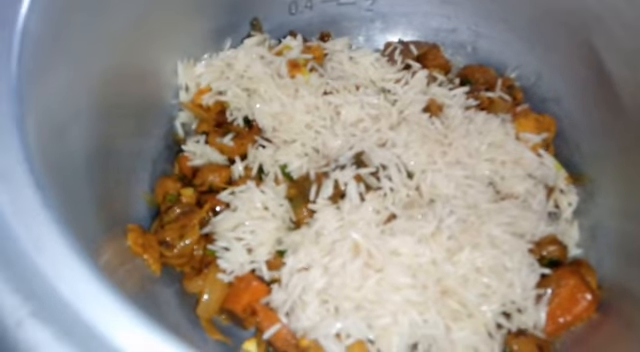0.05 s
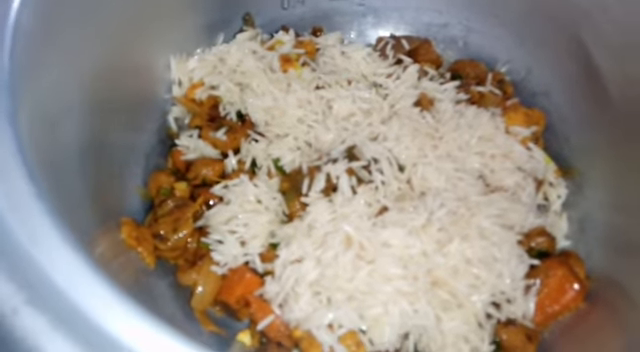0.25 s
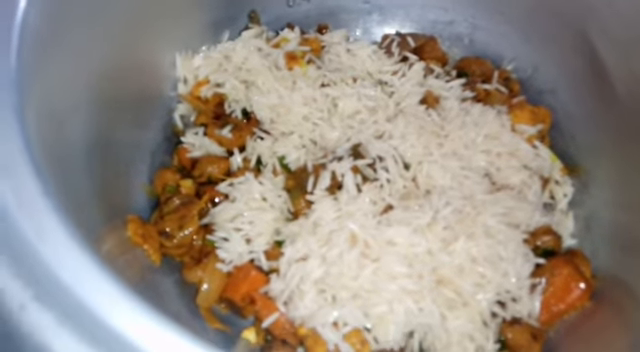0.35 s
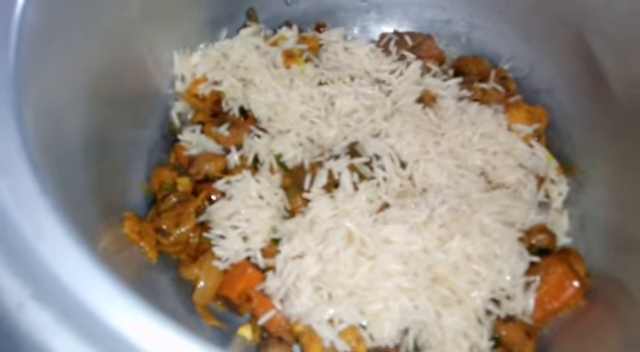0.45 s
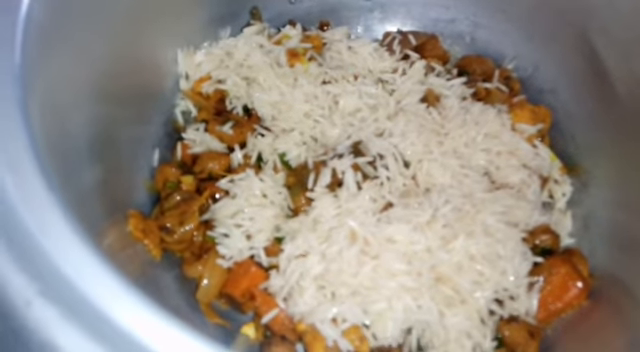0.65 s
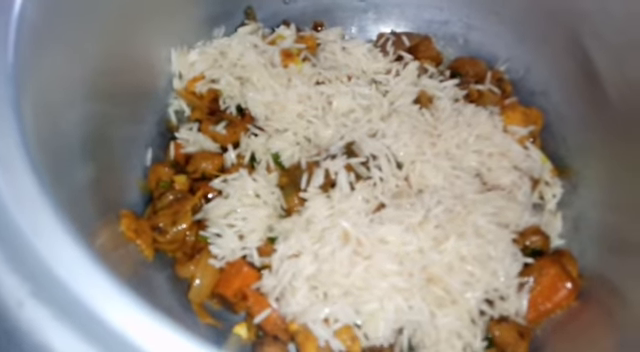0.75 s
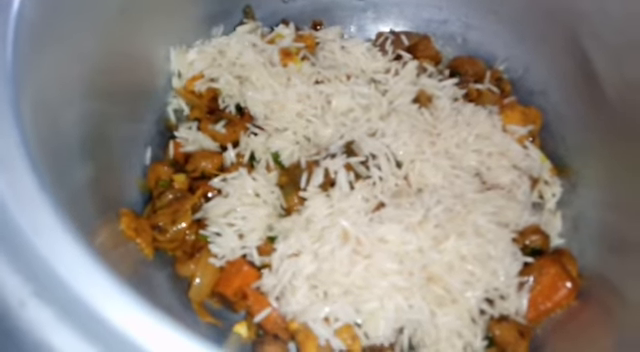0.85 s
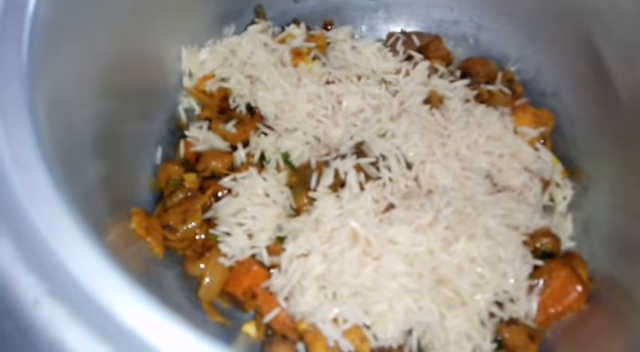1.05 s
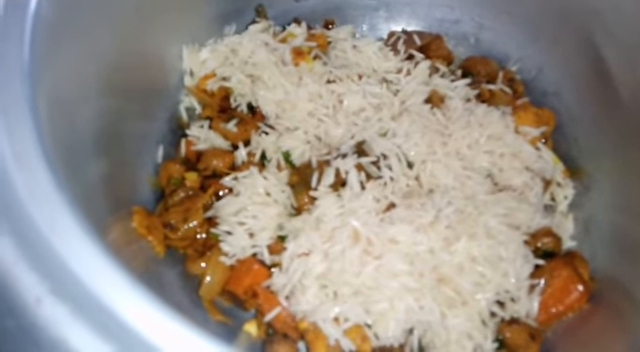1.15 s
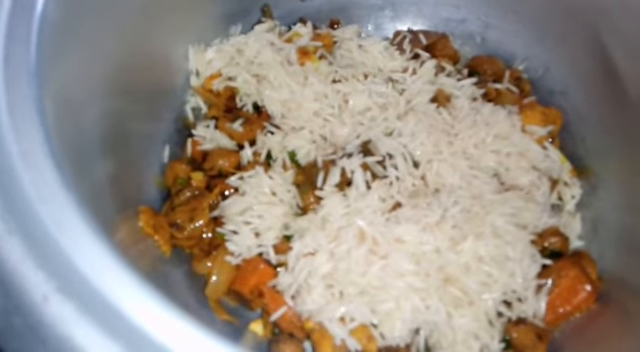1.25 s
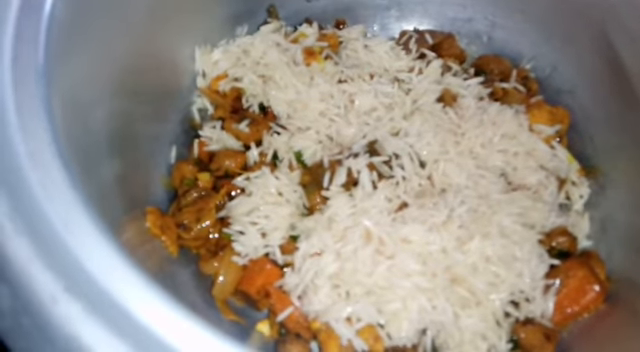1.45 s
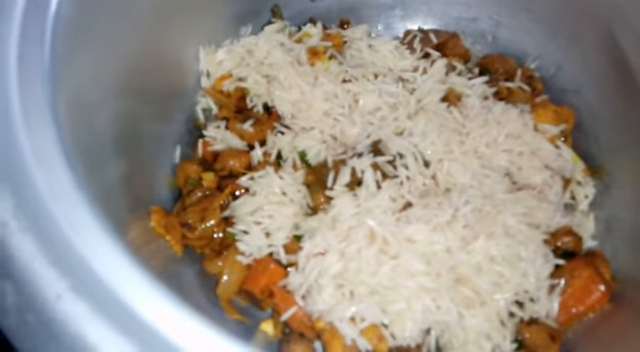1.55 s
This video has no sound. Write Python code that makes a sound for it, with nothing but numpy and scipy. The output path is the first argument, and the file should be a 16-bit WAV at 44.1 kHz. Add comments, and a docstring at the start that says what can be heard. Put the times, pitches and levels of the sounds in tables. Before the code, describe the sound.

A metal spoon digs into wet rice and knocks sharply on a metal bowl's rim

```python
"""A metal spoon digs wet rice out of a bowl and knocks on its rim, close to a stereo microphone in a kitchen.
Clumps of grains crackle and slide, the knocks ring the metal; behind, a fan drones and food sizzles on the right.
Contacts are bursts and streams of random impulses, coloured by filters (bright) and by short modes (dull).
The ringing rim and the pitched clacks are decaying sines, the squeak is an even pulse train,
and the drone is noise in narrow bands."""
import sys
import numpy as np
from scipy import signal
from scipy.fft import rfft, irfft
from scipy.io import wavfile

SR = 44100
rng = np.random.default_rng(int(sys.argv[2]) if len(sys.argv) > 2 else 0)


def volts_from_db(level):
    """Convert decibel levels to linear amplitude ratios."""
    exponent = np.asarray(level, float) / 20
    return 10 ** exponent


def generate_wav(sig):
    """Save sig (samples, or channels by samples) to the path in sys.argv[1] as 16-bit PCM at SR."""
    pcm = np.round(np.clip(np.atleast_2d(sig).T, -1, 1) * 32767).astype(np.int16)
    wavfile.write(sys.argv[1], SR, pcm)


N = 70560   # 1.6 s

# spoon knocks: (time [s], nominal peak [dB], left-right [dB], t60 [ms], dull part re bright [dB])
KNOCKS = [(.4545, -18.5, -9, 53, -6.5), (.478, -9.5, 27, 23, -7), (.4825, -2.5, -5, 34, -46),
          (.4883, -20, -19, 14, 2.5), (.5008, -14, -15, 12, -13), (.5545, -19, 1, 12, -13),
          (.5782, 4, -4, 10.8, -20.5), (.5912, 1, -1.5, 28.4, -28), (.6963, -26, -3, 56, -4)]
# bright colour of grains on metal: (frequency [Hz], relative density [dB per Hz])
BRIGHT = [(2500, -53.5), (4000, -23.5), (8300, -8), (10500, 4), (11700, -11), (12600, -20.5),
          (14700, -31.5), (16100, -67)]
# half of a left-right difference goes to each side: left +, right -
SIDES = np.array([[.5], [-.5]])
CLUMP_LAG_MS, KNOCK_LAG_MS = -2.1, 1.4   # left lags right; negative: left leads
SIZZLE_PAN_DB = -15   # left-right


def rms_one(x):
    """Scales to rms 1."""
    return x / np.sqrt(np.mean(x ** 2) + 1e-20)


def at_hz(points, hz):
    """Reads a table of (frequency, value) on a log-frequency axis."""
    table_hz, values = np.array(points).T
    return np.interp(np.log(hz), np.log(table_hz), values)


def colour(x, spectrum):
    """Minimum-phase filter with the given spectrum; white noise keeps its rms."""
    size = 2048
    db = at_hz(spectrum, np.arange(size // 2 + 1) * SR / size + 1)
    # folding the cepstrum onto positive times gives minimum phase
    cepstrum = irfft(db * np.log(10) / 20)
    cepstrum[1:size // 2] *= 2
    cepstrum[size // 2 + 1:] = 0
    pulse = irfft(np.exp(rfft(cepstrum)))
    pulse = pulse / np.sqrt(np.sum(pulse ** 2))
    return signal.fftconvolve(x, pulse[None], axes=1)[:, :N]


def drift(rate_hz):
    """Slow random wander of rms 1: noise through two equal one-pole lowpasses."""
    r = np.exp(-2 * np.pi * rate_hz / SR)
    noise = rng.standard_normal(N + SR)
    return rms_one(signal.lfilter([1], [1, -2 * r, r * r], noise)[SR:])   # the first second settles


def ring(clicks, hz, t60):
    """A two-pole resonator: a unit click sets a sine of about height 1 ringing, t60 in s."""
    r, w = volts_from_db(-60 / (t60 * SR)), 2 * np.pi * hz / SR
    return signal.lfilter([0, np.sin(w)], [1, -2 * r * np.cos(w), r * r], clicks + 1e-18)


def grains(per_s, spread_db, lag_ms):
    """Random tiny contacts of uneven size, partly shared by both sides with a lag; rms 1."""
    shared = 0.74   # share of the power that both sides hear alike
    unevenness = np.minimum(rng.exponential(1, (3, N)), 5)
    size = volts_from_db(spread_db * unevenness) * rng.choice([-1, 1], (3, N))
    hits = size * (rng.random((3, N)) < per_s / SR)
    both = np.stack([np.roll(hits[2], int(lag_ms * SR / 1000)), hits[2]])
    return rms_one(np.sqrt(shared) * both + np.sqrt(1 - shared) * hits[:2])


def clatter(hits):
    """Deals contacts to short modes of the loaded bowl; each mode passes about the same energy before its level."""
    # modes of the loaded bowl: (frequency [Hz], level [dB])
    mode_levels = [(1000, -21), (2800, -4), (6500, 4.5), (9000, 3)]
    cycles = 65   # how long a grain rings: t60 in cycles of the mode
    pitches = np.geomspace(mode_levels[0][0], mode_levels[-1][0], num=24)
    dealt = rng.integers(0, len(pitches), N)
    out = 0
    for k, hz in enumerate(pitches):
        gain = volts_from_db(at_hz(mode_levels, hz)) * np.sqrt(30 * hz / cycles / SR)
        out = out + gain * ring(hits * (dealt == k), hz, cycles / hz)
    return out


def bursts(rows, spectrum, lag_ms):
    """Each row is a crack in a fast rise, decay and faint tail of grains, in a bright and a dull colour."""
    per_s, spread_db = 5000, 1.5   # grains
    attack_ms, burst_db = 1.2, -9   # rise of a burst; its grain rms re nominal peak
    crack_db, crack_ms = -2, 0.98   # hardest contact re nominal peak, and how far into the burst
    tail_db, tail_t60_ms = -17, 109   # scatter and kitchen echoes after every burst, even on both sides
    ms = np.arange(N) * 1000 / SR
    bright, dull, cracks = 0, 0, np.zeros((2, N))
    for s, db, pan_db, t60_ms, dull_db in rows:
        age = np.maximum(ms - s * 1000, 0)
        decay = volts_from_db(-60 * age / max(t60_ms, 2)) * volts_from_db(pan_db * SIDES)
        tail = volts_from_db(tail_db - 60 * age / tail_t60_ms)
        rise = 1 - np.exp(-age / attack_ms)
        shape = rise * volts_from_db(db + burst_db) * (decay + tail)
        bright = bright + shape
        dull = dull + volts_from_db(dull_db) * shape
        cracks[:, np.searchsorted(age, crack_ms)] = volts_from_db(db + crack_db + pan_db * SIDES.ravel())
    bright_part = colour(bright * grains(per_s, spread_db, lag_ms) + cracks, spectrum)
    return bright_part + clatter(dull * grains(per_s, spread_db, lag_ms))


def drone():
    """The fan: wavering noise in fifth-octave bands, out of phase between the sides in the bass."""
    # fan spectrum: (frequency [Hz], relative density [dB per Hz])
    fan_spectrum = [(25, -35), (100, -5.5), (210, -10), (298, 3), (360, -6), (435, -3.5), (562, -16),
                    (900, -1.5), (1050, -7.5), (1300, -17.5), (7770, -35.5), (16100, -55)]
    # likeness of the sides: (frequency [Hz], correlation [-1 to 1])
    likeness = [(150, -0.93), (640, -0.48), (1400, 0.56), (3000, -0.21)]
    # balance: (frequency [Hz], left-right [dB])
    lean = [(300, -3), (700, -7), (2400, 0)]
    level_db = -52.5   # rms
    out, edges = 0, 22 * 2 ** np.arange(0, 9.6, 1 / 5)
    white = rng.standard_normal((2, 2, N + SR))
    for k, (low, high) in enumerate(zip(edges, edges[1:])):
        band = signal.butter(2, [low, high], "band", fs=SR, output="sos")
        mid, side = signal.sosfilt(band, white[k % 2])[:, SR:]   # neighbouring bands use other noise
        hz = np.sqrt(low * high)
        alike = at_hz(likeness, hz)
        gain = volts_from_db(at_hz(fan_spectrum, hz) + at_hz(lean, hz) * SIDES + 2.0 * drift(12))
        out = out + gain * (np.sqrt(1 + alike) * mid + np.sqrt(1 - alike) * side * [[1], [-1]])
    return volts_from_db(level_db) * rms_one(out)


def sizzle():
    """Fat spits far right: lone pops and short swells of fine bright grains."""
    # lone grains or fat pop: (time [s], nominal peak [dB])
    pop_times = [(.0637, -40), (0.1793, -42), (1.035, -28.5), (1.1043, -39.5), (1.2459, -42), (1.507, -44),
                 (1.594, -42)]
    # sizzle swells: (time [s], level [dB])
    swell_levels = [(1.25, -74), (1.288, -56.5), (1.32, -93.5), (1.394, -51), (1.425, -62), (1.439, -73.5)]
    # colour of pops and spits: (frequency [Hz], relative density [dB per Hz])
    spit_colour = [(7000, -37), (10500, 6.5), (12000, -9), (15600, -20)]
    t60_ms, dull_db = 28, -36   # of a pop
    pops = [(s, db, SIZZLE_PAN_DB, t60_ms, dull_db) for s, db in pop_times]
    swell_db = np.interp(np.arange(N) / SR, *np.transpose(swell_levels))
    swell = volts_from_db(swell_db + SIZZLE_PAN_DB * SIDES)
    fine = colour(grains(6000, 3.5, CLUMP_LAG_MS), spit_colour)   # spits per s, spread in dB
    return bursts(pops, spit_colour, CLUMP_LAG_MS) + swell * fine


def slide():
    """Sliding rice: a dense stream of grains rubbing over metal, its level and place moving."""
    # rice sliding: (time [s], level [dB], left-right [dB], dull part re bright [dB])
    slide_levels = [(0.211, -67.5, -15, -17), (0.256, -43, -31, -4.5), (.295, -44.5, -9.5, -11),
                    (0.356, -32.5, 0.5, -4), (0.427, -40, -11.5, -1.5), (0.445, -53, 11, 0),
                    (0.497, -33, 1.5, 5), (0.566, -40, -1, 2.5), (.62, -38, 4.5, -3.5),
                    (.75, -53.5, -3, -1), (0.837, -50.5, -2, 3), (0.853, -35, -3.5, -6.5),
                    (0.941, -41, -7, -7), (1.001, -48, -5.5, -3), (1.07, -66.5, -7, -12)]
    per_s, spread_db = 8000, 3.5   # grains
    s, *columns = np.transpose(slide_levels)
    db, pan_db, dull_db = (np.interp(np.arange(N) / SR, s, column) for column in columns)
    bright = colour(grains(per_s, spread_db, CLUMP_LAG_MS), BRIGHT)
    dull = volts_from_db(dull_db) * clatter(grains(per_s, spread_db, CLUMP_LAG_MS))
    return volts_from_db(db + pan_db * SIDES) * (bright + dull)


def squeak():
    """The spoon edge slips in a brief train of even stick-slip jerks, cut off by the next knock."""
    start_s, level_db, t60_ms, rise_ms = .4595, -20.5, 64, 2.7
    jerks_per_s = 1000
    t = np.arange(N) / SR
    age = np.maximum(t - start_s, 0)
    jerks = np.diff(np.floor(age * jerks_per_s), prepend=0) * (t < KNOCKS[1][0])
    shape = (1 - np.exp(-age * 1000 / rise_ms)) * volts_from_db(level_db - 60000 * age / t60_ms)
    train = jerks * shape * np.sqrt(SR / jerks_per_s)   # the root gives the even train rms 1
    return colour(np.stack([train] * 2), BRIGHT)


def metal():
    """Knocks strike each rim mode and a twin that beats in opposite sense on the two sides; clacks ring at one pitch."""
    # modes of the free rim: (frequency [Hz], level [dB], t60 [s])
    rim_modes = [(1660, -27, .2), (2390, -22, .33), (3316, -13, .13), (3525, -13, .12), (3919, -4, .16),
                 (5254, -11, .1), (6433, -9, .07), (7946, -5, .09), (8974, 0, .085)]
    # knocks on the free rim, which rings: (time [s], level [dB])
    rim_knocks = [(0.4883, -31), (0.5927, -22)]
    # short clacks of the spoon on damped metal: (time [s], nominal peak [dB], frequency [Hz], t60 [s])
    clacks = [(0.355, -37, 3700, 0.031), (0.369, -46.5, 1387, 0.18), (0.4633, -35, 4054, 0.061),
              (0.489, -19.5, 2945, 0.0077), (0.5446, -25.5, 9940, 0.01), (0.5576, -28, 3400, 0.0044),
              (0.7907, -33, 4130, 0.028)]
    twin_share, twin_db = .007, -9   # the weaker twin is this much higher
    s, db = np.transpose(rim_knocks)
    clicks, out = np.zeros(N), np.zeros((2, N))
    clicks[(s * SR).astype(int)] = volts_from_db(db)
    for hz, level_db, t60 in rim_modes:
        twin = volts_from_db(twin_db) * 2 * SIDES * ring(clicks, hz * (1 + twin_share), t60)   # opposite signs
        out += volts_from_db(level_db) * (ring(clicks, hz, t60) + twin)
    for s, db, hz, t60 in clacks:
        click = volts_from_db(db) * (np.arange(N) == int(s * SR))
        # a second, very short resonance rounds the onset
        out += ring(ring(click, hz, t60), hz, 5.34 / hz) * hz / SR * 4
    return signal.sosfilt(signal.butter(2, 1400, "high", fs=SR, output="sos"), out)


def clumps():
    """Clumps of grains break loose and hit metal in bright bursts."""
    # clumps: (time [s], nominal peak [dB], left-right [dB], t60 [ms], dull part re bright [dB])
    clump_hits = [(.226, -28, -21, 11.3, -9.5), (.240, -9.5, -14.5, 28.4, -22.5),
                  (.2435, -6.5, -25, 14.2, -16.5), (.2465, -11, -13.5, 40, -16), (.2523, -26, -33, 17, -23),
                  (.3015, -18, -12.5, 55, -13.5), (.307, -9.5, -21, 15.7, -37), (.333, -21, -18, 43, -23),
                  (.3432, -16.5, -6, 8, -28), (.349, -15, -14.5, 78, -15.5), (.366, -19, -22.5, 9.5, -15.5),
                  (.417, -23.5, -12, 38, -36), (.768, -16, -13.5, 9.7, -2), (.791, -30.5, -6, 55, 1.5),
                  (.799, -23.5, -24, 14, -22), (.842, -12, -9.5, 14.7, -22),
                  (.9905, -20.5, -16.5, 12, -14.5)]
    return bursts(clump_hits, BRIGHT, CLUMP_LAG_MS)


def knocks():
    """The spoon knocks on the bowl: bursts of contacts in a colour of their own."""
    # bright colour of a knock: (frequency [Hz], relative density [dB per Hz])
    knock_colour = [(3500, -38), (6300, -1), (10800, 3.5), (13600, -11.5), (16100, -51)]
    return bursts(KNOCKS, knock_colour, KNOCK_LAG_MS)


def scene():
    """Bowl sounds over the background."""
    background = drone() + sizzle()
    bowl = slide() + squeak() + metal() + clumps() + knocks()
    return background + bowl


def roll_off(x):
    """The treble ends steeply here."""
    return signal.sosfilt(signal.butter(12, 16290, fs=SR, output="sos"), x)


def record(dry):
    """A slightly lopsided microphone: loud sound leaves a low push (square law), and peaks are rounded."""
    square_law_db, square_law_hz = -20.5, 127
    lowpass = signal.butter(4, square_law_hz, fs=SR, output="sos")
    push = signal.sosfilt(lowpass, dry ** 2)
    mix = np.tanh(dry - volts_from_db(square_law_db) * push)
    return roll_off(mix)


dry = scene()
out = record(dry)
generate_wav(out)
```